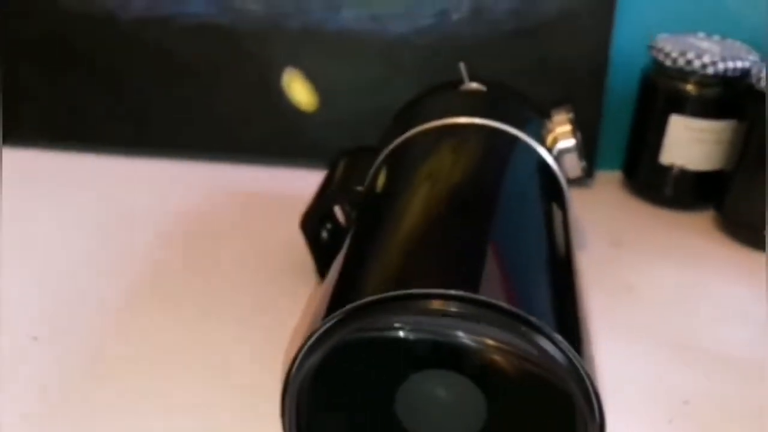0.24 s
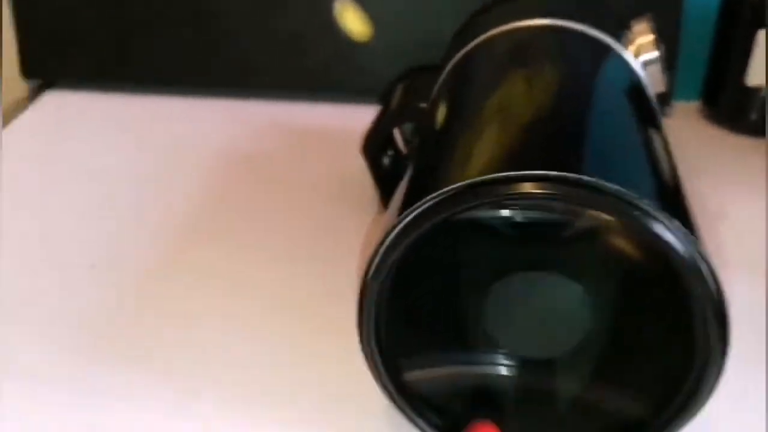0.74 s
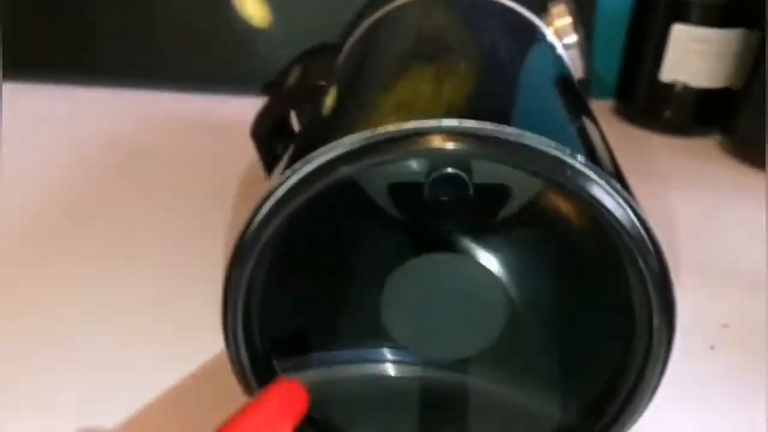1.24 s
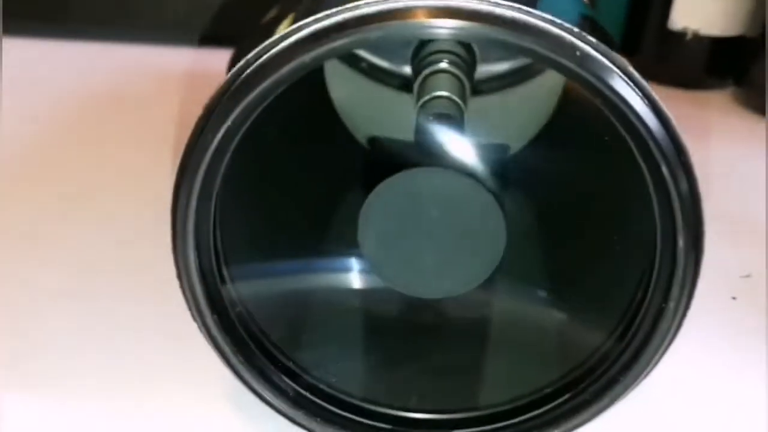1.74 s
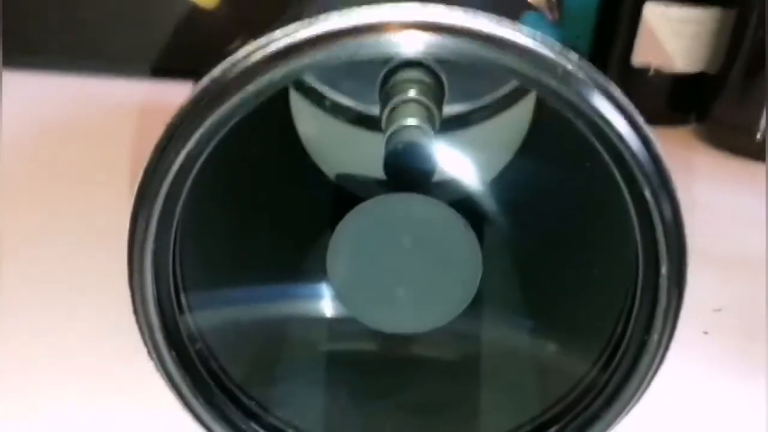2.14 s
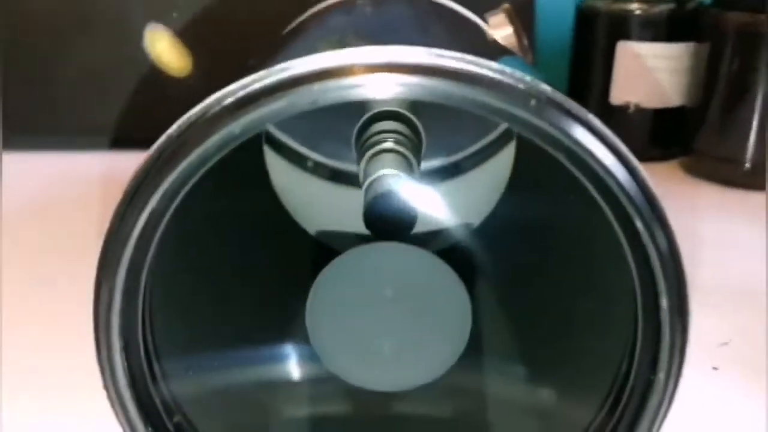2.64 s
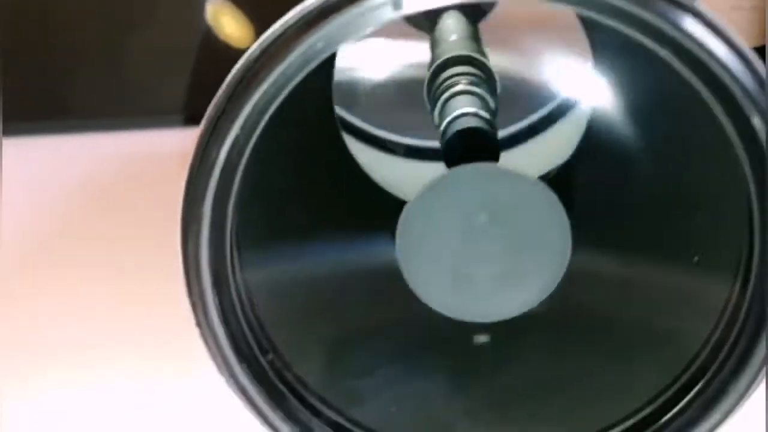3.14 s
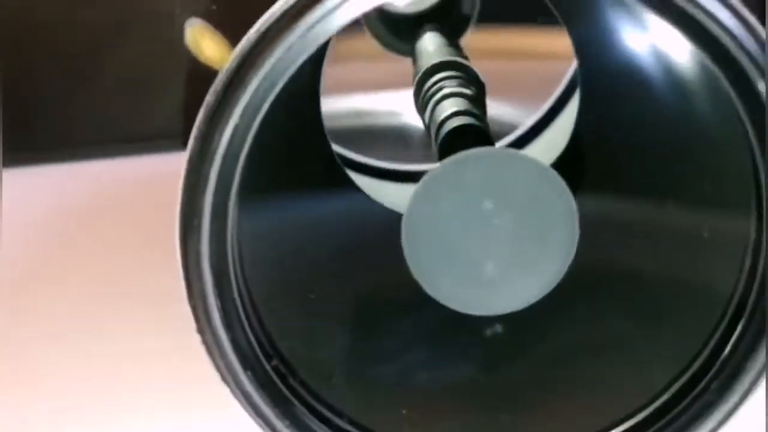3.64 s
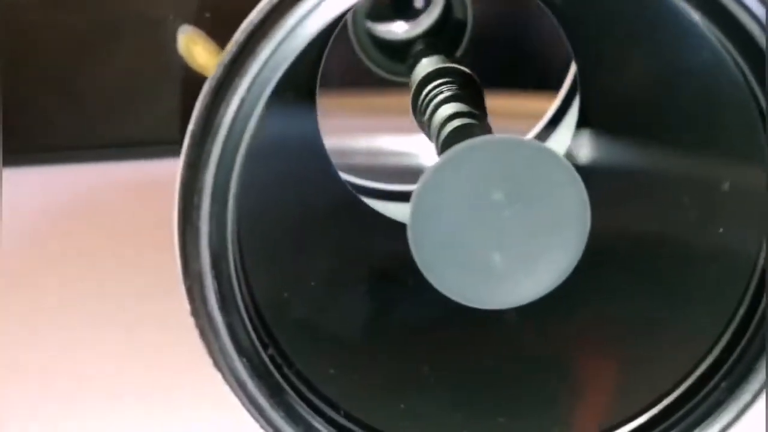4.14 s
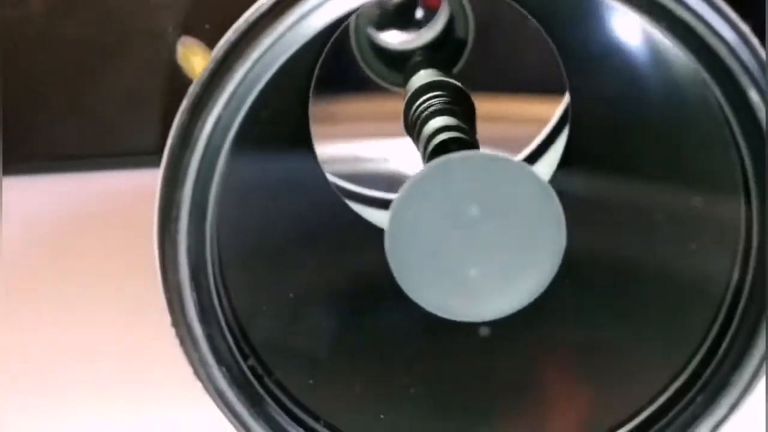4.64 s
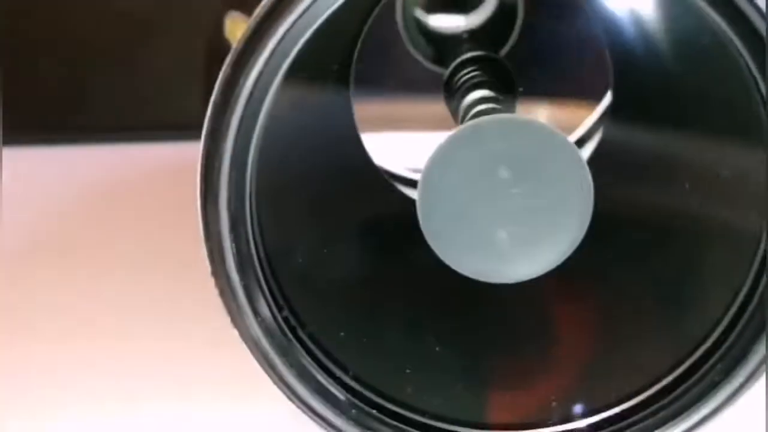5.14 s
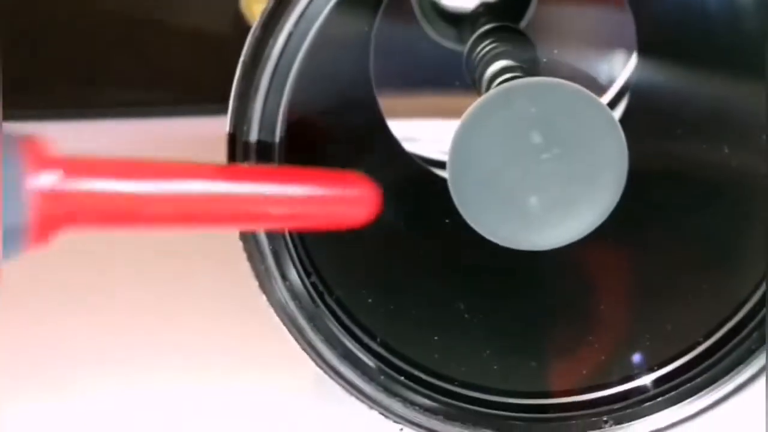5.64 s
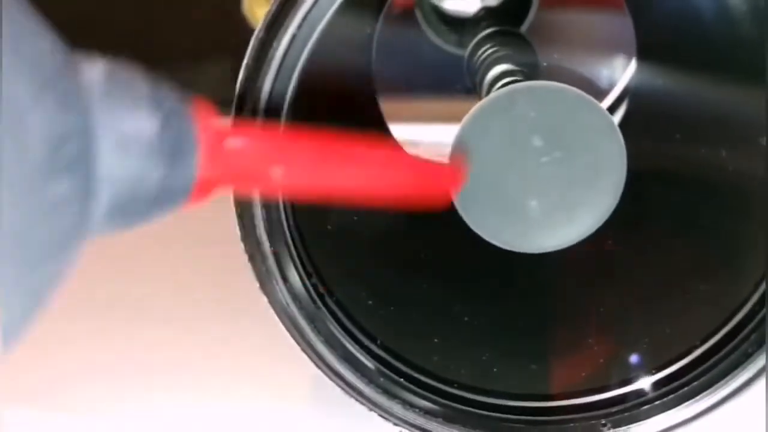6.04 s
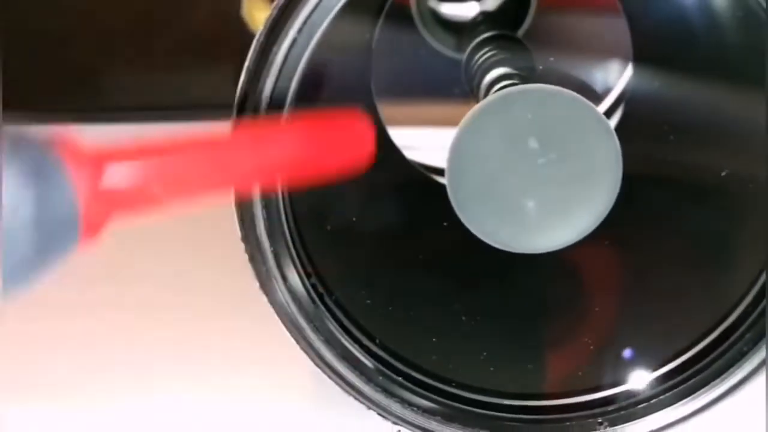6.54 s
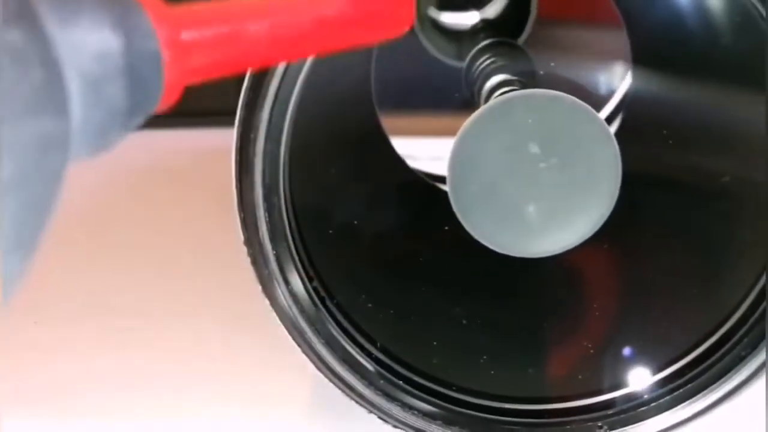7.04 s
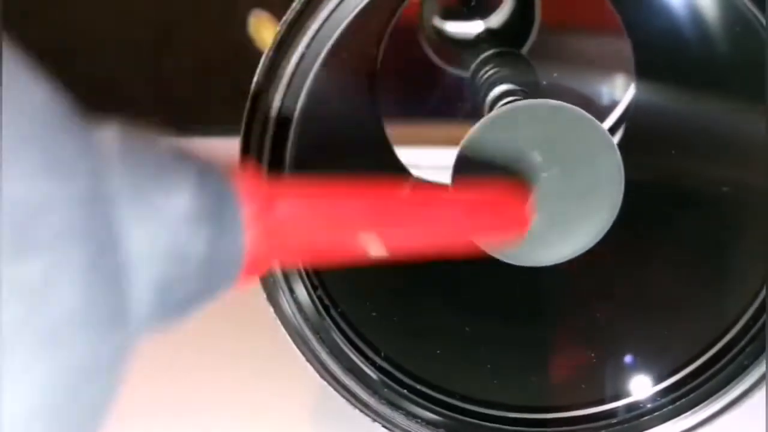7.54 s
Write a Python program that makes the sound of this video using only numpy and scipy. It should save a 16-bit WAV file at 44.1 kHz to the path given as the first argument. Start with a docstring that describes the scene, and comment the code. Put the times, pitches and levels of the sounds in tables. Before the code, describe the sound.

Hand-held device creaks, knocks and thumps for five seconds, pauses nearly silent, then rapid breathy air puffs from a squeezed rubber bulb close by.

```python
"""A narrow, smooth whoosh and faint rubbing open the scene, over the noise of a quiet room.
A hand shifts a phone over a counter: slipping skin excites noise bands, creaks ring damped modes of the
case, bumps push and swing it, and tremor shakes it in low bands; microphones at its two ends hear the
contacts at slightly different times. Then a rubber bulb blower on the left puffs out through its nozzle
and sucks back in, stroke after stroke: turbulent noise shaped by the flow and the nozzle's resonances."""
import sys
import numpy as np
from scipy import signal
from scipy.fft import rfft, irfft, next_fast_len
from scipy.io import wavfile
from scipy.ndimage import uniform_filter1d

SR = 44100
rng = np.random.default_rng(int(sys.argv[2]) if len(sys.argv) > 2 else 0)


def waveform_to_disk(signal):
    """Save audio, clipped to [-1, 1], as 16-bit WAV at the path in sys.argv[1]."""
    frames = np.transpose(np.atleast_2d(signal))
    scaled = np.clip(frames, -1, 1) * 32767
    samples = np.round(scaled).astype(np.int16)
    wavfile.write(sys.argv[1], SR, samples)


N = 343098
T = np.arange(N) / SR
HZ = np.fft.rfftfreq(next_fast_len(N), 1 / SR) + 1  # 1 Hz offset keeps the logarithm finite
STEP = np.arange(0, N / SR + .002, .001)  # times of the slow controls, s
SPAN_S = 0.00073  # travel time from one microphone to the other
BEND_SPAN_S = 0.00083  # slow bending waves take longer

# Strokes of the bulb, out and in by turns: start t/s, end of push t/s, jet level at mid-stroke/dB,
# low share at mid-stroke/dB, left minus right at mid-stroke/dB
STROKES = [(6.116, 6.256, -38, -7.5, 8.5), (6.411, 6.534, -49.5, -5.5, 8), (6.568, 6.716, -40, -8, 7.5),
           (6.806, 6.92, -47.5, -6, 9.5), (6.96, 7.103, -38.5, -8.5, 8.5), (7.145, 7.256, -47.5, -7, 9),
           (7.311, 7.441, -39.5, -5.5, 9.5), (7.498, 7.602, -52, -3, 13.5), (7.651, 7.8, -40, -7.5, 9.5)]


def undb(db):
    """Decibels are twenty times the logarithm of an amplitude ratio."""
    return 10 ** (np.asarray(db) / 20)


def unit(x):
    """Normalisation to a root-mean-square of one."""
    return x / np.sqrt(np.mean(x ** 2))


def on_hz(table):
    """A spectrum in f/Hz, level/dB points, interpolated on logarithmic frequency."""
    hz, db = np.transpose(table)
    return np.interp(np.log(HZ), np.log(hz), db)


def peaks(table):
    """Resonance curves: each f/Hz, width/Hz, level/dB row gives the magnitude of one damped mode."""
    return np.array([undb(db) / np.hypot(1, 2 * (HZ - f) / width) for f, width, db in table])


def colour(x, gain):
    """Linear filtering: the spectrum is multiplied by a gain, then the power is normalised."""
    size = next_fast_len(N)
    return unit(irfft(rfft(x, size) * gain, size)[:N])


def walk(rate):
    """A slow random modulation: levels held for 1 / rate seconds and smoothed twice; spread near 1."""
    k = max(int(SR / rate), 2)
    held = np.repeat(rng.standard_normal(N // k + 1), k)
    return unit(uniform_filter1d(uniform_filter1d(held, k), k)[:N])


def read(tables):
    """Piecewise-linear envelopes: tables joined in time, their columns read at every sample."""
    s, *columns = np.transpose(np.concatenate(tables))
    return [np.interp(T, s, column) for column in columns]


def swell(s, rise, hold, fall, db):
    """Exponential growth and decay: the power of each event rises, holds and falls straight in dB."""
    s, rise, hold, fall, db = (np.reshape(c, (-1, 1)) for c in (s, rise, hold, fall, db))
    away = np.maximum(s - STEP, 0) / rise + np.maximum(STEP - s - hold, 0) / fall
    return undb(2 * (db - 20 * away)) + 1e-30  # rise and fall times span 20 dB


def blend(power, column):
    """Power weighting: a per-event value at every sample, led by the loudest event."""
    return np.interp(T, STEP, np.asarray(column) @ power / power.sum(axis=0))


def both_ends(x, other, pan_db, alike, span_s):
    """Delay, level difference and partial coherence: the nearer end hears earlier and louder."""
    lag = span_s * SR * np.tanh(pan_db / 2.46) / 2
    at, alike = np.arange(N), np.clip(alike, 0, 1)
    left = np.interp(at + lag, at, x)
    right = alike * np.interp(at - lag, at, x) + np.sqrt(1 - alike ** 2) * other
    return np.array([left * undb(pan_db / 2), right * undb(-pan_db / 2)])


def add(out, s, pair):
    """Superposition: a short stereo sound is summed in at time s."""
    i = int(s * SR)
    out[:, i:i + pair.shape[1]] += pair[:, :N - i]


def ring(t, hz, t60, rise):
    """Free decay of a damped mode after a push of finite length."""
    t = np.maximum(t, 0)
    return np.sin(2 * np.pi * hz * t) * np.exp(-np.log(1000) * t / t60) * (1 - np.exp(-t / rise))


def grit(flicker_db, rate):
    """Stick-slip friction: dense uneven clicks and a hiss, flickering together."""
    size = np.minimum(rng.exponential(size=N), 3)
    happens = rng.random(N) < .03
    slips = happens * undb(2.5 * size) * rng.standard_normal(N)
    return (.6 * unit(slips) + rng.standard_normal(N)) * undb(flicker_db * walk(rate))


def rubbing():
    """Friction-driven resonance: slipping skin excites body modes, bright surface and dull bending."""
    # Rubs of skin on the case: start of hold t/s, rise t/s, hold t/s, fall t/s, level/dB,
    # upper-to-lower body power/dB, bright share/dB, dull share/dB, left minus right/dB
    rubs = [(0.0, .05, 0.05, 0.31, -58.5, 7, -2, -5.5, -2),
            (0.303, 0.41, .03, 0.23, -65.5, 16, -2.5, -5, -3),
            (0.536, 0.028, .003, 0.037, -50.5, -16, -2.5, -15, -1),
            (0.62, .15, .07, .17, -63, 3, -2.5, -7.5, 0.5),
            (1.268, 0.16, .01, 0.33, -62.5, -2, -6, 0, -0.5),
            (1.42, 0.057, 0.074, 0.056, -58, 7, 0.5, 5, 5), (1.589, 0.046, .015, .1, -49, 7, -4, 1, 11),
            (1.628, 0.073, 0.013, 0.097, -49, 5, -1.5, -1.5, 18),
            (1.709, 0.13, 0.097, 0.39, -47, 5.5, -9, -14, -1),
            (1.925, 0.44, 0.113, 0.21, -58.5, -3, -9, -5, -3),
            (2.067, 0.07, 0.022, 0.27, -55.5, 9, -8, -4, 8),
            (2.252, 0.023, 0.021, 0.052, -41, 4, -8.5, 1, -8.5),
            (2.397, 0.13, 0.17, 0.49, -49.5, 1, -4, 4, -4.5),
            (2.558, 0.19, 0.12, 0.17, -42.5, -2.5, -6.5, -0.5, -4),
            (2.96, 1, 0.071, 0.33, -56, -7, -8.5, -3, -4), (3.194, 0.25, .03, .1, -55.5, -7, -3, -3, -2),
            (3.278, 0.1, 0.0046, 0.063, -48, -5, -10, -7.5, -4),
            (3.367, .1, .005, 0.068, -53, -1, -0.5, 0, -5.5),
            (3.589, 0.16, 0.092, 0.17, -51.5, 15, -5, -5.5, -3.5),
            (3.715, 0.22, .004, 0.039, -43.5, -4, -15.5, -7, -4.5),
            (3.79, 0.034, .004, 0.035, -50.5, -7, -15, -26, -4),
            (3.94, 0.15, .05, 0.28, -78.5, -11, -28, 8, -4),
            (4.067, 0.31, .005, 0.62, -58, -8, -17, 1.5, -5),
            (4.22, 0.063, .005, 0.093, -59, -16, -12, 9.5, -10),
            (4.286, 0.083, .005, .14, -55, -12, -15, 6.5, -9.5),
            (4.373, 0.11, 0.019, 0.053, -52.5, -18, -18, 2.5, -7.5),
            (4.411, 0.12, .004, 0.036, -53.5, -2, -6.5, 3.5, 0),
            (4.604, 0.033, 0.013, 0.18, -51.5, 3.5, -13, -0.5, -12.5),
            (4.747, 0.11, 0.0046, 0.14, -52.5, -6, -5.5, -0.5, -2),
            (4.967, 0.076, .005, 0.053, -44.5, 8, -3, -13, 12),
            (5.034, 0.035, 0.012, 0.044, -48.5, 0, -2, -1.5, 11),
            (5.064, 0.066, 0.0091, 0.023, -39.5, 25, -5, -18, 18),
            (5.184, 0.092, .01, .3, -67.5, 6, -18, -12, -0.5),
            (5.26, .2, 0.041, 0.24, -66.5, 1, -7, -0.5, 2),
            (6.047, 0.16, .005, .11, -56.5, 2.5, -2, -3.5, 3.5)]
    # Lower and upper body modes: f/Hz, width/Hz, half the relative level/dB (the sum is squared below)
    lower_modes = [(1140, 100, 2.5), (1398, 540, 15)]
    upper_modes = [(1944, 540, 6), (2230, 260, -9), (2700, 900, -13)]
    # Spectra of the surface hiss and of the dull bending: f/Hz, relative level per Hz/dB
    bright = [(1470, -26), (2500, 2), (3530, 0), (4590, -2.5), (5450, -5.5), (7530, -7), (8810, -5.5),
              (10800, -17.5), (15000, -59)]
    dull = [(150, -24), (250, 3.5), (450, -1), (700, 2), (1000, 0), (1400, -37.5)]
    s, rise, hold, fall, db, upper_db, bright_db, dull_db, pan_db = np.transpose(rubs)
    power = swell(s, rise, hold, fall, db)
    pan_db = blend(power, pan_db)
    slips = grit(3.23, 45)
    upper = 1 / (1 + undb(-2 * upper_db))  # power share of the upper modes
    layers = (  # spectrum, power share, likeness at the two ends
        (peaks(lower_modes).sum(axis=0) ** 2, 1 - upper, .6),
        (peaks(upper_modes).sum(axis=0) ** 2, upper, .4),
        (undb(on_hz(bright)), undb(2 * bright_db), .2),
        (undb(on_hz(dull)), undb(2 * dull_db), .9))
    out = 0
    for k, (gain, share, alike) in enumerate(layers):
        # the shift gives every layer its own moments of slip
        x = colour(np.roll(slips, k * SR), gain)
        other = colour(np.roll(slips[::-1], k * SR), gain)
        level = np.interp(T, STEP, np.sqrt(share @ power))
        out = out + level * both_ends(x, other, pan_db, alike, SPAN_S)
    return out


def creaks():
    """Modal excitation: each slip rings a boom and the knock modes near its centre, with a dry tick."""
    # Creaks and ticks of the case and the bulb: t/s, boom level/dB, boom f/Hz, boom left minus right/dB,
    # knock level/dB, knock centre f/Hz, tick level/dB, tick centre f/Hz,
    # knock and tick left minus right/dB, damping factor
    contacts = [(0.533, -54, 398, -4, -34, 2020, -38, 7100, -1, 2.1),
                (0.6779, -31, 626, -7, -46, 1790, -49, 4100, -10, 1.1),
                (0.7335, -61, 620, -9, -47.5, 2090, -64, 5100, -11, 0.77),
                (1.1219, -23, 644, -8, -33.5, 1620, -41, 4830, -7.5, 1.44),
                (1.236, -22.5, 650, -8, -32, 1680, -41, 4170, -10, 1.46),
                (1.2727, -23.5, 664, -8.5, -35.5, 1690, -47, 4400, -7, 1.6),
                (1.306, -23, 650, -7.5, -40.5, 1810, -56, 4300, -15, 1.5),
                (1.345, -31, 477, -8, -46, 1610, -47, 3900, 11, 2.6),
                (1.3759, -17.5, 650, -6, -20, 2010, -36, 4950, -7, 2),
                (1.4036, -19, 640, -5.5, -25.5, 1530, -43, 4000, -5, 1.45),
                (1.4247, -21.5, 650, -3.5, -23, 2370, -38.5, 3500, 20, 1.9),
                (1.4297, -18.5, 610, -7, -36, 2010, -39, 4000, 7, 2.5),
                (1.5538, -32.5, 398, -6, -38.5, 1660, -59, 5100, -7, 0.88),
                (1.5989, -31, 410, -10, -26, 2090, -44, 5400, 2, 1.2),
                (1.6354, -27, 797, 8.5, -29, 2220, -26.5, 3900, 20.5, 1.1),
                (1.6428, -31, 406, -8, -22, 1980, -40, 4400, 4, 1.5),
                (1.6966, -52, 382, -7, -33, 2410, -38.5, 4000, 15, 1.1),
                (1.8053, -16, 696, -4, -26, 1570, -53, 4400, -9, 1.8),
                (1.874, -20.5, 720, -5.5, -23, 1560, -48, 4500, -8, 2.3),
                (2.028, -24, 600, -5.5, -25, 1820, -33, 6900, -5.5, 1.05),
                (2.0746, -40, 511, -8, -12.5, 2360, -29, 4100, 16, 2.3),
                (2.084, -48, 689, 2, -21, 1660, -34, 3530, 13.5, 1.4),
                (2.259, -18.5, 617, 4.5, -28, 1640, -35, 7150, -10, 1.04),
                (2.2666, -19.5, 457, -1, -32, 1790, -49, 5140, 0, 1.4),
                (2.3685, -4, 740, -4.5, -8, 1890, -31, 3700, -10.5, 2.23),
                (2.392, -36, 468, -2, -45, 2010, -47, 5200, -3, 1.4),
                (3.051, -56, 516, 0, -45, 1970, -43, 3900, 7, 1.4),
                (3.2607, -45.5, 387, -3, -35, 1490, -54, 5800, -11, 0.81),
                (3.351, -47, 920, -13, -28, 2560, -23.5, 3780, -1, 1.6),
                (3.4852, -40, 514, -2, -55, 1760, -43, 4760, 5, 2),
                (3.703, -34.5, 500, 1, -25.5, 1500, -46, 4700, -7, 1.36),
                (4.065, -44, 586, -10, -34, 1790, -49, 4100, -8.5, 1.2),
                (4.405, -30, 656, 8, -29, 1570, -30, 3740, 12, 1.9),
                (4.7522, -31.5, 785, -7.5, -27, 1770, -31.5, 6200, -6, 1.5),
                (4.9806, -64.5, 436, -6, -27.5, 2300, -18, 5290, 15, 1.5),
                (4.9831, -31.5, 437, 0, -8, 1787, -10, 3950, 14, 1.3),
                (5.0487, -31, 736, 0, -21, 2300, -27.5, 3900, 20, 1.5),
                (5.0601, -29.5, 420, 1.5, -17.5, 1840, -20, 3730, 9.5, 0.56),
                (5.0663, -27, 387, -1, -21, 1950, -18.5, 3650, 20.5, 1.2),
                (6.0468, -50, 930, 11, -55, 2100, -32, 7900, 18.5, 0.6),
                (6.607, -41.5, 510, 3, -43, 1870, -31, 8000, 4, 0.49),
                (6.921, -50, 960, 10, -40, 1520, -55, 5000, 19, 1.7),
                (7.054, -33.5, 985, 6.5, -50, 1800, -55, 5000, 4, 0.47),
                (7.1638, -40.5, 980, 7, -50, 1460, -41, 5800, -11, 0.64)]
    # Knock modes of the case: f/Hz before a small random detuning, decay t60/s at damping factor 1
    knock_modes = [(1150, 0.0073), (1420, 0.02), (1640, 0.016), (1830, 0.019), (2080, 0.016),
                   (2400, 0.0091), (2800, 0.014)]
    boom_t60_s, tick_t60_s = 0.041, 0.0096  # the boom's at damping factor 1
    out, t = np.zeros((2, N)), np.arange(1024) / SR
    ends = np.array([[1], [-1]])
    chance = rng.standard_normal((len(contacts), len(knock_modes)))
    noise = rng.standard_normal((len(contacts), 2, len(t)))
    for contact, detune, tick in zip(contacts, chance, noise):
        s, boom_db, hz, boom_pan_db, knock_db, knock_hz, tick_db, tick_hz, pan_db, damp = contact
        late = t - SPAN_S * (ends * boom_pan_db < 0)  # the farther end hears later
        boom = undb(boom_db + ends * boom_pan_db / 2) * ring(late, hz, boom_t60_s / damp, 0.00039)
        boom = boom * np.exp(-(late * damp / .011) ** 4)  # the finger settles back and mutes the tail

        late = np.maximum(t - SPAN_S * (ends * pan_db < 0), 0)
        knock = 0
        for (f, t60), jitter in zip(knock_modes, detune):
            nearness = undb(-28 * abs(np.log2(f / knock_hz)))
            knock = knock + nearness * ring(late, f * (1 + 0.019 * jitter), t60 / damp, 0.00069)

        band = (tick_hz / 1.5, tick_hz * 1.36)
        tick = unit(signal.sosfilt(signal.butter(3, band, "band", fs=SR, output="sos"), tick))
        tick = tick * np.exp(-np.log(1000) * late / tick_t60_s) * (1 - np.exp(-late / 0.0016))
        contact_sound = undb(knock_db) * knock + undb(tick_db) * tick
        add(out, s - .0006, boom + undb(ends * pan_db / 2) * contact_sound)
    return out


def bumps():
    """Impulse and recoil: one soft push of the finger, then the phone swings back and shudders."""
    # Dull bumps: t/s, push level/dB, signed strength (inward +, outward -), push length at half height t/ms,
    # swing f/Hz, swing level/dB, swing t60/s; the strength multiplies push and swing
    blows = [(0.339, -41, -1, 2.7, 78.5, -43, 0.095), (0.3782, -48, -1.1, 3.9, 83, -48, 0.069),
             (0.54, -38.5, 0.93, 2.5, 50.3, -43, 0.17), (0.61, -48, 1, 6.3, 80, -42.5, 0.1),
             (1.561, -36, 1, 2.8, 98, -36, 0.1), (2.27, -17.5, 1, 0.75, 61.5, -37.5, 0.18),
             (2.469, -26.5, -1.1, 2.6, 26, -25.5, 0.12), (2.522, -24.5, -1, 0.95, 39.8, -27, 0.17),
             (2.7239, -18.5, 0.96, 3.5, 41.7, -18, 0.07), (2.842, -20.5, 0.97, 3.6, 170, -25.5, 0.1),
             (3.9422, -20.5, 0.78, 1.4, 43.8, -27.5, 0.38), (4.002, -32, 1, 2.3, 61, -36, 0.085),
             (4.1029, -15, 0.95, 2.8, 87, -21.5, 0.085), (4.1486, -15.5, -0.88, 2.04, 99, -22, 0.088),
             (4.2125, -22.5, 1, 3.2, 132, -37.5, 0.085), (4.406, -14, 1, 0.89, 26.3, -32, 0.13),
             (4.5846, -32.5, 1, 7.2, 127, -29.5, 0.11), (5.1848, -31.5, -0.93, 0.61, 174, -34.5, 0.049),
             (5.274, -36, -1.2, 1.3, 104, -39, 0.02), (6.6092, -36, 0.96, 1.1, 197, -45, 0.084),
             (6.9267, -33.5, -1.1, 0.65, 153, -55, 0.17), (7.0038, -30.5, 0.86, 0.55, 85.6, -56, 0.1),
             (7.26, -31.5, -1, 0.59, 163, -43, 0.056), (7.6162, -28.5, -0.74, 0.6, 154, -35.5, 0.044)]
    out, t = np.zeros((2, N)), np.arange(6144) / SR - .01
    shudder = rng.standard_normal((len(blows), len(t)))
    shudder = unit(signal.sosfilt(signal.butter(2, (45, 260), "band", fs=SR, output="sos"), shudder))
    for (s, db, way, ms, hz, swing_db, t60), noise in zip(blows, shudder):
        late = t - BEND_SPAN_S * np.array([[.5], [-.5]])  # the right end hears it first
        push = undb(db) * np.exp(-np.log(16) * (late * 1000 / ms) ** 2)
        after = late - ms / 2000  # the swing starts half a push length after the peak
        swing = ring(after, hz, t60, 0.00025) + 0.3 * noise * ring(after, 17.3, t60, 0.00067)
        add(out, s - .01, way * (push - undb(swing_db) * swing))
    return out


def trembling():
    """Low-frequency forced vibration: tremor and jerks shake the phone in bands about a moving centre."""
    # Tremor of the grip: t/s, drive level/dB, centre f/Hz
    tremor = [(0.0, -69, 78), (0.15, -61, 76), (0.32, -58.5, 80), (0.97, -59.5, 61.7), (1.45, -50, 84),
              (1.6, -63, 91), (2.0, -60, 85), (2.3, -66, 90), (2.45, -48.5, 60.3), (2.79, -43, 48),
              (2.9, -67, 70), (3.1, -50.5, 44.6), (3.6, -48.5, 44), (3.9, -57, 54), (4.79, -60, 77),
              (5.06, -53, 128), (5.13, -68, 124), (7.78, -70, 82.4)]
    # Jerks of the hand: t/s, rise t/s, fall t/s, drive level/dB, centre f/Hz
    jerk_events = [(1.73, .15, 0.22, -48, 93), (1.88, 0.16, 0.12, -44.5, 91), (2.04, 0.12, 0.26, -48.5, 92),
                   (2.69, 0.13, 0.26, -41, 67.6), (4.16, 0.093, 0.058, -27, 64.8),
                   (4.51, 0.13, 0.047, -48, 55.6), (4.64, .08, 0.17, -40, 97)]
    db, hz = read([tremor])
    # the bulb springs back at the end of each intake: rise and fall .22 s, -64 dB, 106.5 Hz
    refills = [(end, .22, .22, -64, 106.5) for _, end, *_ in STROKES[1::2]]
    s, rise, fall, jerk_db, jerk_hz = np.transpose(jerk_events + refills)
    power = swell(s, rise, 0, fall, jerk_db)
    steady, jerks = undb(2 * db), np.interp(T, STEP, power.sum(axis=0))
    hz = (steady * hz + jerks * blend(power, jerk_hz)) / (steady + jerks)
    out = 0
    for band_hz in (28, 40, 56, 80, 112, 160, 225):
        x = colour(rng.standard_normal(N), peaks([(band_hz, band_hz * 0.64, 0)])[0] ** 2)
        octaves = np.log2(band_hz / hz)
        # 23 dB per octave below the centre, 11.4 above
        slope_db = 23 * np.minimum(octaves, 0) - 11.4 * np.maximum(octaves, 0)
        out = out + x * undb(5.2 * walk(26) + slope_db)
    return both_ends(np.sqrt(steady + jerks) * out, 0, np.full(N, -1.5), 0.77, 2.0 * BEND_SPAN_S)


def blower():
    """Jet turbulence filtered by pipe resonance; intake strokes have their own colour."""
    # Spectra of the jet, outward and inward, then of its low part: f/Hz, relative level per Hz/dB
    jet_out = [(1470, -44), (2500, -2.5), (3270, -2.5), (3940, -5), (5280, -5), (6460, -4.5), (9570, 0.5),
               (11000, -6), (12100, -4), (14700, -10.5), (15800, -11)]
    jet_in = [(1470, -37), (2500, -22), (2830, -28), (3060, -1.5), (3480, -2), (4060, -2.5), (5660, -1.5),
              (13200, -5.5), (15800, -15.5)]
    low_out = [(250, -5), (500, -5), (800, 2.5), (1400, -3.5), (2200, 4), (3000, -6), (4000, -28)]
    low_in = [(250, -6.5), (500, -3), (950, 1), (1400, -5), (2100, -3), (2600, -9.5), (3100, -19),
              (4000, -28)]
    # Resonances of the nozzle pipe: f/Hz, width/Hz, boost/dB
    nozzle = [(960, 80, 8), (1970, 170, 4), (5470, 300, 3), (7700, 500, 4), (9710, 600, 3), (11900, 400, 4),
              (14500, 350, 2)]
    # The far end of the phone is duller: f/Hz, left minus right/dB before the 8 dB mean is removed
    shadow = [(2500, 1), (3300, 3), (4200, 3), (5400, 10), (6500, 9), (7600, 9), (8600, 8), (9600, 5),
              (10600, 11), (11500, 12), (13000, 10), (14500, 13)]
    # Edges of the eddy bands: f/Hz
    eddy_hz = [300, 800, 1150, 1700, 2500, 3600, 5000, 6800, 8800, 11000, 13300, 17000]
    gain, low_db, pan_db, intake = strokes()
    bells = peaks([(f, width, 0) for f, width, _ in nozzle]) ** 2
    pipe = 1 + (bells * (undb([[boost] for *_, boost in nozzle]) - 1)).sum(axis=0)
    tilt_db = (on_hz(shadow) - 8) / 2
    noise = rng.standard_normal((4, N)) * undb(.9 * walk(60) + .6 * walk(200))
    spectrum_out = pipe * undb(on_hz(jet_out))
    spectrum_in = pipe ** .4 * undb(on_hz(jet_in))  # the nozzle rings less when air is drawn in

    def hiss(x, tilt):
        mixed = (1 - intake) * colour(x, spectrum_out) + intake * colour(x, spectrum_in)
        return colour(mixed, undb(tilt))

    high = np.array([hiss(noise[0], tilt_db), hiss(noise[1], -tilt_db)])
    high = high * undb(np.array([pan_db, -pan_db]) / 2)
    low_spectrum_out, low_spectrum_in = pipe * undb(on_hz(low_out)), undb(on_hz(low_in))
    low = [(1 - intake) * colour(x, low_spectrum_out) + intake * colour(x, low_spectrum_in)
           for x in noise[2:]]
    low = undb(low_db) * both_ends(*low, 0.42 * pan_db, 0.65, SPAN_S)
    jet = (high + low) * gain

    # eddies of each size come and go on their own, so the colour shifts within a stroke
    first = int(STROKES[0][0] * SR)
    out = jet.copy()
    for band in zip(eddy_hz, eddy_hz[1:]):
        part = signal.sosfilt(signal.butter(2, band, "band", fs=SR, output="sos"), jet[:, first:])
        out[:, first:] += part * (undb(1.4 * walk(14) + 1.5 * walk(45))[first:] - 1)
    return out


def strokes():
    """Jet noise scales as a power of flow: gain, low share, pan and intake share over the strokes."""
    start, end, db, low_db, pan_db = np.transpose(STROKES)[:, :, None]
    way = np.arange(len(STROKES)) % 2  # 0 out, 1 in

    def by_way(out_value, in_value):
        return np.array([out_value, in_value])[way, None]

    attack, release = by_way(0.092, 0.08), by_way(0.059, 0.053)  # s
    swell_db, low_grows_db, drift_db = by_way(10, 14), by_way(-19, 74), by_way(-22, -37)  # dB per s
    opening = np.sin(np.pi / 2 * np.clip((STEP - start) / attack, 0, 1))
    closing = np.cos(np.pi / 2 * np.clip((STEP - end) / release, 0, 1))
    flow = opening * closing
    since = np.clip(STEP, start, end + release) - (start + end) / 2  # time from mid-stroke
    # the last air trickles out after each stroke
    dying = np.exp(-np.maximum(STEP - end - release / 2, 0) / 0.077)
    trickle = undb(-21) * np.clip((STEP - start) / (end - start), 0, 1) * dying
    gain = undb(db + swell_db * since) * (np.abs(flow) ** 2.33 + trickle) + 1e-12
    total = gain.sum(axis=0)

    def mean(column):
        return np.interp(T, STEP, (gain * column).sum(axis=0) / total)

    return (np.interp(T, STEP, total), mean(low_db + low_grows_db * since),
            mean(pan_db + drift_db * since), mean(way[:, None]))


def leak():
    """Narrow-band turbulence: a first light press lets a thin hiss of air out of the nozzle."""
    # Envelope of the leak: t/s, level/dB before the offsets of the two ends
    envelope = [(5.86, -99), (5.924, -60), (5.976, -73), (6.006, -57), (6.052, -56), (6.1, -69),
                (6.13, -72)]
    # Resonances: f/Hz, width/Hz, half the relative level/dB (the sum is squared below)
    resonances = [(6550, 2200, 6), (8230, 1400, -13)]
    db, = read([envelope])
    spectrum = peaks(resonances).sum(axis=0) ** 2
    near, far = (colour(rng.standard_normal(N), spectrum) for _ in range(2))
    on = (T > envelope[0][0]) & (T < envelope[-1][0])
    return np.array([undb(3.5) * near, undb(-11.0) * far]) * undb(db) * on


def whoosh():
    """Resonant filtering of noise: a few narrow bands, a little stronger on the right."""
    # Envelopes, one list per appearance: t/s, level/dB
    envelopes = [
        [(0.0, -55), (0.1, -60.5), (0.2, -69), (0.31, -62.5), (0.42, -67), (0.528, -72), (0.6, -66)],
        [(5.12, -80), (5.308, -76), (5.4, -80)],
    ]
    # Resonances: f/Hz, width/Hz, relative level/dB
    resonances = [(2010, 190, 0), (2880, 300, -16), (10060, 930, -12.5)]
    db, = read(envelopes)
    on = sum((T >= table[0][0]) & (T < table[-1][0]) for table in envelopes)
    halved = [(f, width, level_db / 2) for f, width, level_db in resonances]  # squared next
    spectrum = peaks(halved).sum(axis=0) ** 2
    x, other = (colour(rng.standard_normal(N), spectrum) for _ in range(2))
    pair = both_ends(x, other, np.full(N, -3.5), .5, SPAN_S)
    return pair * undb(db) * uniform_filter1d(1. * on, 2000)  # soft edges


def echo(air):
    """Diffuse reverberation: counter and walls return the airborne sound as a decaying noise tail."""
    t = np.arange(SR // 4) / SR
    decay = np.exp(-np.log(1000) * t / .15)  # 60 dB in .15 s
    tail = rng.standard_normal((2, len(t))) * decay * (t > .004)
    tail = tail / np.sqrt((tail ** 2).sum(axis=1, keepdims=True))
    return undb(-13) * signal.fftconvolve(air.mean(axis=0)[None], tail, axes=1)[:, :N]


def room():
    """Stationary background noise of room and microphones, with a faint phase-wandering hum."""
    # Spectra common to both ends and opposite at them: f/Hz, relative level per Hz/dB
    mid_spectrum = [(15, -38.5), (25, -35), (148, -2.5), (284, -1), (361, -9.5), (654, -21), (1060, -17.5),
                    (1470, -20), (1780, -15), (1930, -19.5), (10300, -27.5), (15800, -31.5)]
    side_spectrum = [(15, -39), (25, -17), (76, -11), (144, -13), (284, -8), (392, -0.5), (1180, -13),
                     (1980, -11.5), (5670, -18), (8050, -18), (15800, -26)]
    # Swells of the hum above its floor: start of hold t/s, rise t/s, hold t/s, fall t/s, level/dB
    hum_swells = [(1.66, .11, .18, 0.22, -60), (5.17, 0.226, .02, 0.28, -68.5),
                  (5.846, 0.099, 0.017, .3, -66.5)]
    mid, side = (undb(db + 0.35 * walk(6)) * colour(rng.standard_normal(N), undb(on_hz(table)))
                 for table, db in ((mid_spectrum, -65), (side_spectrum, -68.5)))
    swells = np.sqrt(swell(*np.transpose(hum_swells)).sum(axis=0))
    level = undb(-78.5) + np.interp(T, STEP, swells)
    hum_hz = 332
    hum = np.sqrt(2) * level * np.sin(2 * np.pi * hum_hz * T + 0.78 * walk(6.7))
    return np.array([mid + hum + side, mid + hum - side])


def scene():
    """Superposition of all sources; contact sounds travel in the case and stay without echo."""
    air = blower() + leak()
    contacts = rubbing() + creaks() + bumps() + trembling()
    return contacts + air + echo(air) + whoosh() + room()


def record(dry):
    """Band limiting: a steep low-pass at 15650 Hz leaves no treble above it."""
    return signal.sosfilt(signal.ellip(10, .2, 80, 15650, fs=SR, output="sos"), dry)


dry = scene()
out = record(dry)
waveform_to_disk(out)
```